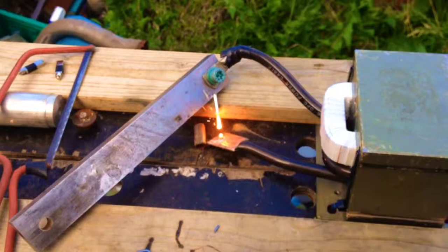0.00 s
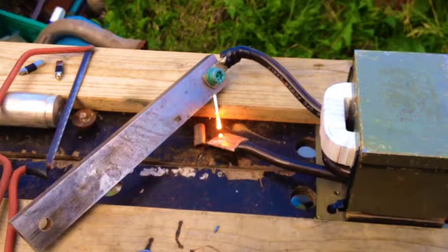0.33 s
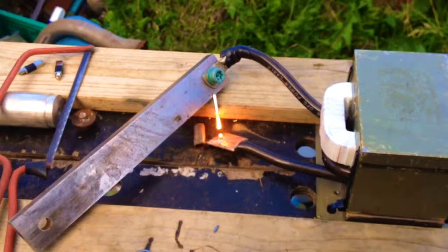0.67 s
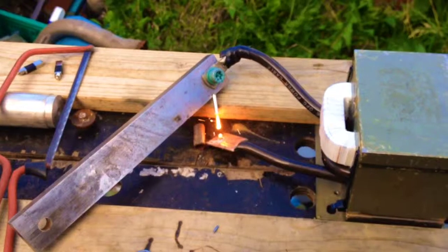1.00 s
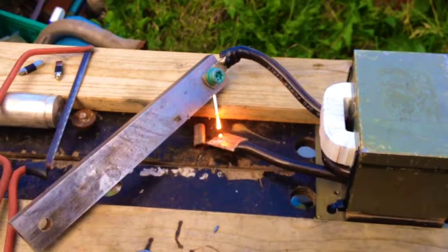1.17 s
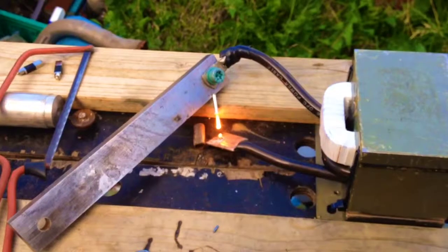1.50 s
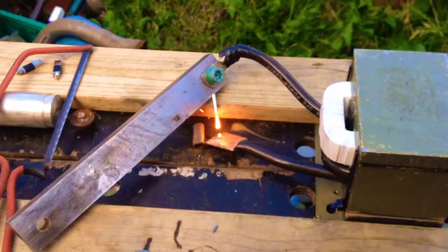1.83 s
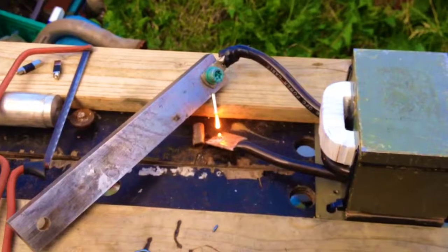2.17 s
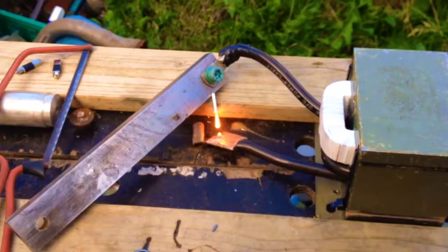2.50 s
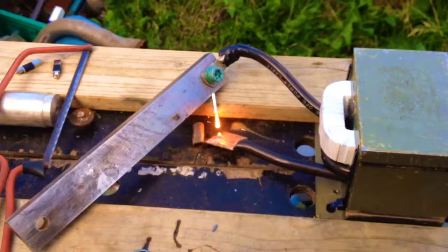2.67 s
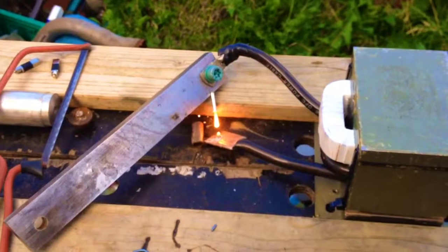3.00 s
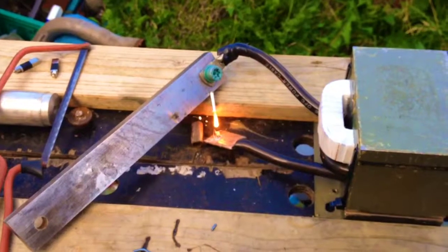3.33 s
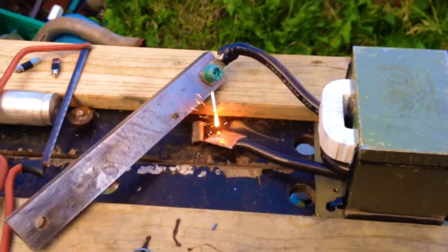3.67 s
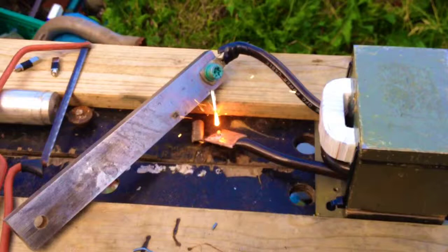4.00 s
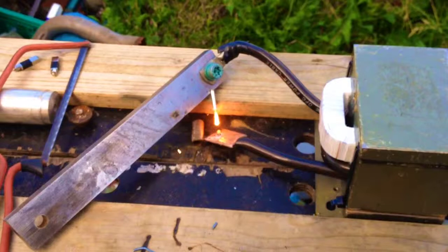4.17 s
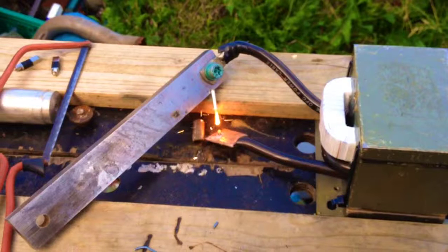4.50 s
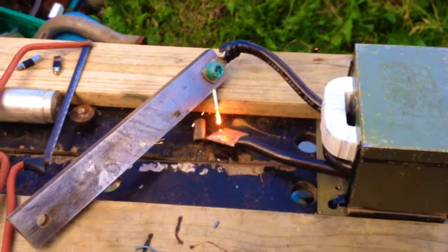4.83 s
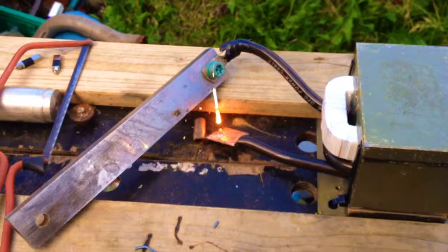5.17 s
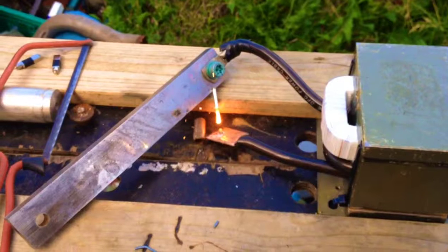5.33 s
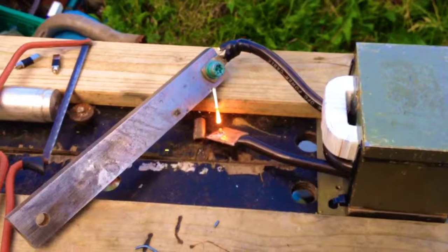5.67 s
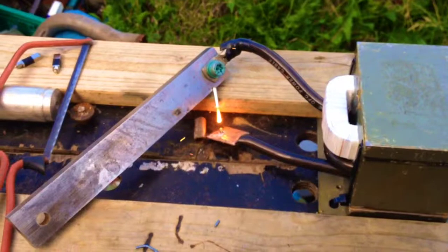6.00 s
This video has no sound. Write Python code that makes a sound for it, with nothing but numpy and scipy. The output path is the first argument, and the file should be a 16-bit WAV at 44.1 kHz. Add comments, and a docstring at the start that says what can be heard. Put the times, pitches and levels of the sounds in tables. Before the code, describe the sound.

A heavy mains transformer buzzes in slow motion, its drone broken into about ten rattling thuds a second over a low hum, the steel case ringing throughout. A glowing shorted contact sizzles faintly and throws off soft spark ticks, strongest in the first two seconds. Past the middle, two light gusts flutter deeply on the microphone. The outdoor sound is muffled, with a thin gritty edge in the treble.

```python
"""Ten rattling thuds a second over a low hum: a heavy mains transformer buzzing in tenfold slow motion.
Each magnetic cycle flexes its iron core and slaps loose steel together, so the case rings and chatters.
It drives a short circuit through glowing metal, which sizzles and throws off sparks as soft ticks.
Wind is a deep flutter on the microphone, with a soft outdoor rush behind the bench.
Holding each sample for ten steps lays a gritty mirror image of it all in the treble."""
import sys
import numpy as np
from scipy.fft import rfft, irfft, next_fast_len
from scipy.io import wavfile
from scipy.ndimage import map_coordinates

SR = 44100
rng = np.random.default_rng(int(sys.argv[2]) if len(sys.argv) > 2 else 0)


def transcribe(signal):
    """Save signal, clipped to [-1, 1], as a 16-bit WAV file at the path in sys.argv[1]."""
    frames = np.atleast_2d(signal).T
    limited = np.clip(frames, -1, 1)
    pcm = np.round(limited * 32767).astype(np.int16)
    wavfile.write(sys.argv[1], SR, pcm)


N = 267069

BUZZ_HZ = 9.99207  # magnetic cycles a second, two per mains period
# how hard the hot contact sizzles: t/s, level/dB
SIZZLE_RIDE = [(0.0, -69.5), (0.66, -66), (0.93, -73), (1.18, -70.5), (2.41, -68.5), (3.94, -67),
               (4.19, -65.5), (4.77, -68.5), (6.05, -71)]
# colour of everything the hot contact spits out: f/Hz, gain/dB
SPIT_EQ = [(300, -26), (800, -2.5), (1000, -5), (1100, -3.5), (1200, 3), (1300, 1.5), (1420, 2),
           (1520, 3.5), (1700, -11.5)]


def amp(db):
    """Decibels to gain."""
    return 10 ** (np.asarray(db) / 20)


def unit(x):
    """x at rms 1."""
    return x / np.sqrt(np.mean(x ** 2) + 1e-20)


def curve(rows):
    """(time, value) breakpoints to one value per sample."""
    return np.interp(np.arange(N) / SR, *np.transpose(rows))


def swell(start, attack, hold, release):
    """An envelope that rises to 1, holds and falls back to 0."""
    return np.interp(np.arange(N) / SR, start + np.cumsum([0, attack, hold, release]), [0, 1, 1, 0])


def wobble(rate):
    """A smooth random drift, rate knots a second."""
    return map_coordinates(rng.standard_normal(int(N * rate / SR) + 4), [np.arange(N) * rate / SR])


def cycle(crest_s):
    """Phase of the magnetic cycle, zero at crest_s."""
    return 2 * np.pi * BUZZ_HZ * (np.arange(N) / SR - crest_s)


def filtered(x, response):
    """x through a complex frequency response."""
    size = next_fast_len(len(x) + SR)
    return irfft(rfft(x, size) * response(np.fft.rfftfreq(size, 1 / SR)), size)[:len(x)]


def coloured(x, eq):
    """x through an EQ curve of (f/Hz, gain/dB) points on a log axis."""
    hz, db = np.transpose(eq)
    return filtered(x, lambda f: amp(np.interp(np.log(f + 1), np.log(hz + 1), db)))


def noise(eq):
    """Coloured noise of rms 1."""
    return unit(coloured(rng.standard_normal(N), eq))


def ticks(times, peaks, ring_hz, rise_s):
    """Tiny pings that swell for rise_s and die quickly."""
    t = np.arange(SR // 50) / SR
    envelope = t / rise_s * np.exp(1 - t / rise_s)
    pings = peaks[:, None] * envelope * np.sin(2 * np.pi * ring_hz[:, None] * t)
    where = np.round(np.abs(times) * SR).astype(int)[:, None] + np.arange(len(t))
    return np.bincount(where.ravel(), pings.ravel(), N)[:N]


def core_hum(crest_s=0.0759, waver_db=2.0):
    """The iron flexes twice per mains period; its low harmonics all crest together."""
    # partials of the core's smooth hum: multiple of the buzz rate, level/dB
    partials = [(2, -42), (3, -54), (6, -66), (7, -56)]
    phase = cycle(crest_s)
    tone = np.sqrt(2) * sum(amp(db) * np.cos(order * phase) for order, db in partials)
    return amp(waver_db * wobble(6.1)) * tone


def steel_slaps(waver_db=1.48, low_cut_hz=85):
    """Each cycle knocks loose steel together, and the case rings on from one cycle to the next."""
    # hits within every cycle: t/s, level/dB, contact brightness f/Hz
    hits = [(0.0362, 3.0, 215.0), (0.0789, 2.8, 324.0), (0.0873, -6.8, 439.0), (0.0902, -11.2, 601.0),
            (0.1027, -4.5, 303.0)]
    # modes of the core and its steel case: f/Hz, width/Hz, gain/dB
    modes = [(118.4, 9.2, 0.5), (150.6, 5.2, 10), (167.9, 12.8, 7.5), (222.87, 5.96, 16.5), (238, 27, -1.5),
             (282, 18, 8), (309.3, 6.0, 16), (369, 4.3, 5.5), (399.3, 30.0, 6.5), (436.6, 5.4, 13),
             (487.8, 6.16, 30.5), (550, 11, 8.5), (591, 5.2, 7), (795, 67, 6)]
    starts = np.arange(-5, int(N / SR * BUZZ_HZ) + 1) / BUZZ_HZ  # already buzzing at the start
    force = np.zeros(N + 2 * SR)  # a second spare at each end
    for offset_s, db, bright_hz in hits:
        where = np.round((starts + offset_s + 1) * SR).astype(int)
        blows = amp(db) * np.bincount(where, minlength=len(force))
        force -= filtered(blows, lambda f: 1 / (1 + (f / bright_hz) ** 6))  # softer contact, less treble

    def case(f):
        """The modes ring together; a small case radiates little bass."""
        ring = sum(amp(db) * 1j * f * width / (hz * hz - f * f + 1j * f * width)
                   for hz, width, db in modes)
        return ring * (1 - 1 / (1 + (f / low_cut_hz) ** 8))

    return amp(waver_db * wobble(12)) * filtered(force, case)[SR:SR + N]


def case_rattle(rumble_db=-49.5, pulse_db=1.36, chatter_db=-58.5, gate_db=7, loosen_db_per_s=0.95):
    """The case rumbles; its plates chatter in uneven bursts, one a cycle, looser as the load goes on."""
    # colour of the case's rumble: f/Hz, gain/dB
    rumble_eq = [(20, -25), (45, -2.5), (90, -1), (130, 2.5), (170, -1.5), (250, -2), (350, -11),
                 (480, -13.5), (650, -25.5), (850, -25.5), (1500, -44)]
    # colour of the chattering plates: f/Hz, gain/dB
    plate_eq = [(150, -24), (260, -1.5), (380, -0.5), (480, 0.5), (600, -7.5), (700, -20.5), (1000, -33.5)]
    rumble = amp(rumble_db + pulse_db * np.cos(cycle(crest_s=0.089))) * noise(rumble_eq)
    burst_db = gate_db * (np.cos(cycle(crest_s=0.092)) - 1)
    looseness_db = loosen_db_per_s * np.arange(N) / SR + 1.5 * wobble(6)
    return rumble + amp(chatter_db + looseness_db + burst_db) * noise(plate_eq)


def contact_sizzle(hiss_db=4.0, grain_db=1.5, spread_db=3.5, centre_hz=1300, pulse_db=1, count=1800):
    """The glowing metal spits a dense stream of ticks, pulsing with the current, over a soft hiss."""
    times = rng.uniform(0, (N - 1) / SR, count)
    sizes = amp(spread_db * np.minimum(rng.exponential(size=count), 4))
    ring_hz = centre_hz * np.exp(0.26 * rng.standard_normal(count))
    grains = unit(coloured(ticks(times, sizes, ring_hz, rise_s=0.00039), SPIT_EQ))
    current = np.cos(2 * cycle(crest_s=0.074))
    flicker_db = 0.7 * wobble(5)
    crackle = amp(grain_db + pulse_db * current) * grains
    hiss = amp(hiss_db) * noise(SPIT_EQ)
    return amp(curve(SIZZLE_RIDE) + flicker_db) * (crackle + hiss)


def wind(calm_db=-54, attack_s=0.096, release_s=0.32, rush_trim_db=4, flutter_db=2.0):
    """A light breeze with two gusts buffets the microphone, while a soft rush swells behind."""
    # gusts: start t/s, hold/s, level/dB
    gusts = [(3.35, 0.38, -41.5), (4.5, .5, -47)]
    # colour of the wind on the microphone: f/Hz, gain/dB
    buffet_eq = [(3, -29.5), (10, -1.5), (16, -8), (26, -8.5), (40, -17.5), (70, -33), (200, -59),
                 (600, -120)]
    # rise and fall of the outdoor rush: t/s, level/dB
    rush_ride = [(0.0, -70), (0.84, -70), (1.89, -63), (3.18, -63), (4.48, -67), (4.89, -64.5), (6.05, -68)]
    # colour of that rush: f/Hz, gain/dB
    rush_eq = [(300, -40.5), (500, -5), (640, -2.5), (820, -5.5), (930, -12), (1100, -11.5), (1550, -19.5)]
    gusting = sum(amp(db) * swell(start, attack_s, hold, release_s) for start, hold, db in gusts)
    buffet = (amp(calm_db) + gusting) * noise(buffet_eq)
    rush = amp(curve(rush_ride) + rush_trim_db + flutter_db * wobble(12)) * noise(rush_eq)
    return buffet + rush


def sparks(trim_db=4.5, small_db=14.5, spread_db=2.5, centre_hz=1258, small_count=10):
    """Droplets burst off the contact, all near one pitch; bench and case throw back weak echoes."""
    # the loudest sparks: t/s, level/dB
    big_sparks = [(0.0765, -44), (0.5724, -41.5), (0.6704, -50.5), (0.9807, -45.5), (1.3323, -45.5),
                  (1.923, -43), (2.1806, -49), (3.4238, -48.5), (3.7655, -52), (4.0013, -52.5),
                  (4.153, -51), (4.5715, -50), (4.6782, -51.5), (4.802, -51.5)]
    small_s = rng.uniform(0, (N - 1) / SR, small_count)
    sizzle_db = np.interp(small_s, *np.transpose(SIZZLE_RIDE))  # small sparks follow the sizzle's level
    sizes_db = sizzle_db + small_db + spread_db * rng.standard_normal(small_count)
    times, levels_db = np.hstack([np.transpose(big_sparks), [small_s, sizes_db]])
    ring_hz = centre_hz * np.exp(0.018 * rng.standard_normal(len(times)))
    direct = coloured(ticks(times, amp(levels_db + trim_db), ring_hz, rise_s=0.00055), SPIT_EQ)
    echo = lambda f, delay_s, db: amp(db) * np.exp(-2j * np.pi * f * delay_s)
    return filtered(direct, lambda f: 1 + echo(f, delay_s=0.00417, db=-10) + echo(f, 0.011, -14))


def scene():
    """Transformer, hot contact and breeze, mixed in mono."""
    return (core_hum() + steel_slaps() + case_rattle() + contact_sizzle() + sparks() + wind())[None]


def record(dry, hold=10, band_hz=1540, top_hz=14850, dull_hz=16000):
    """Slow-motion texture: a low band limit, grit from sample-and-hold, and a dulled top end."""
    muffled = filtered(dry[0], lambda f: np.clip((band_hz - f) / 60 + 0.5, 0, 1))
    stepped = np.repeat(muffled[::hold], hold)[:N]  # mirrors the sound around multiples of 4410 Hz
    return filtered(stepped, lambda f: (f < top_hz) / (1 + (f / dull_hz) ** 8))[None]


dry = scene()
out = record(dry)
transcribe(out)
```